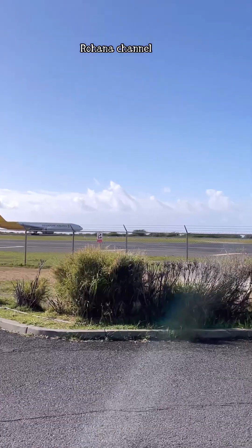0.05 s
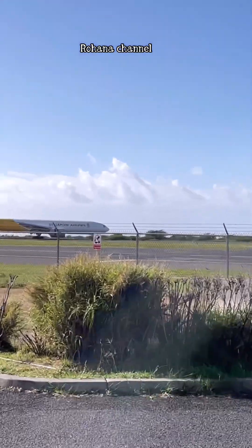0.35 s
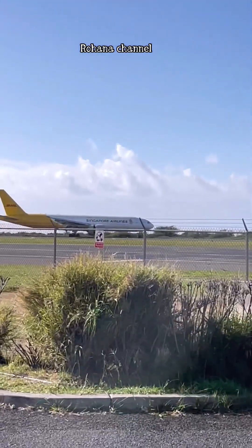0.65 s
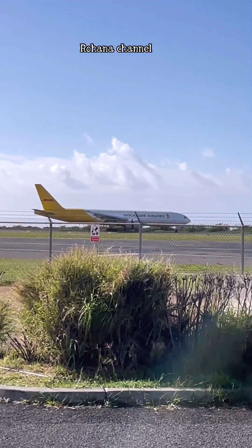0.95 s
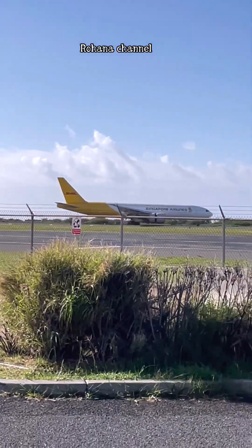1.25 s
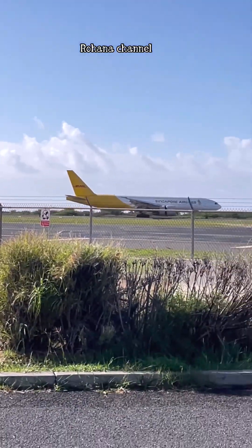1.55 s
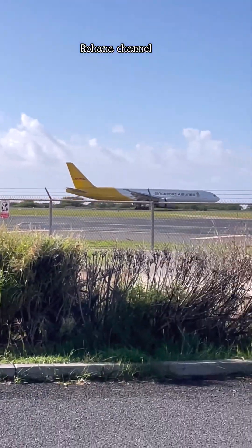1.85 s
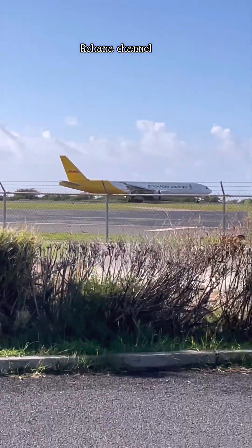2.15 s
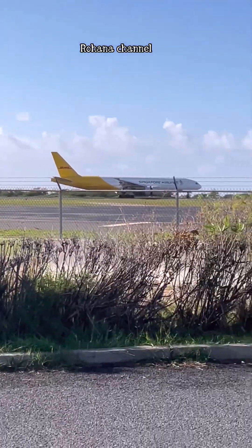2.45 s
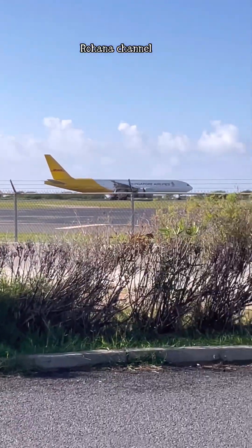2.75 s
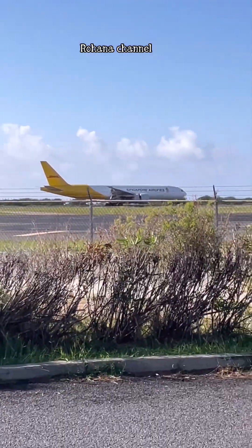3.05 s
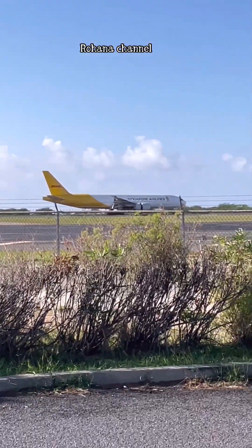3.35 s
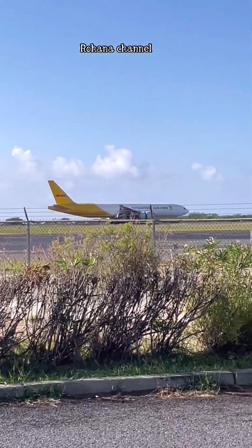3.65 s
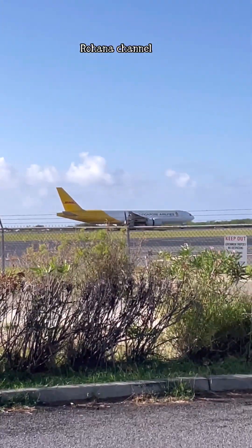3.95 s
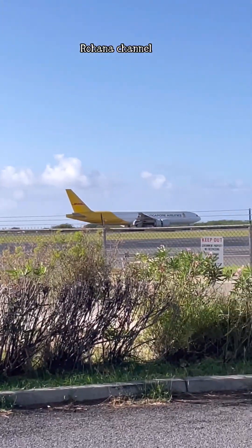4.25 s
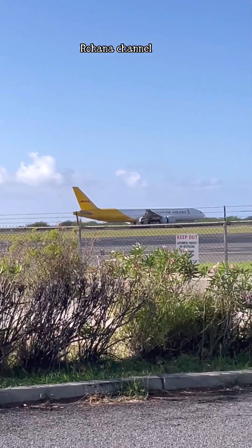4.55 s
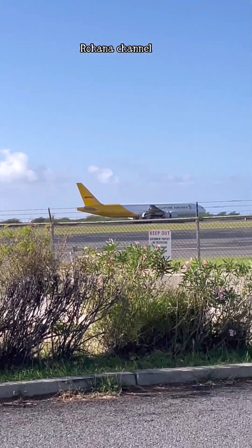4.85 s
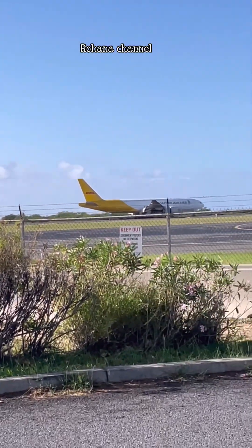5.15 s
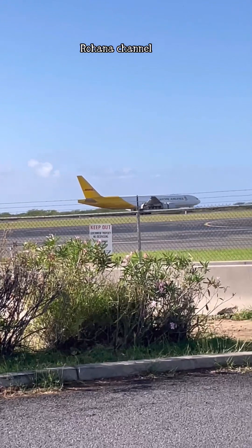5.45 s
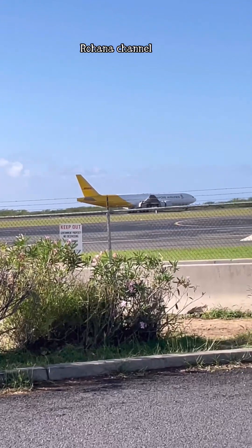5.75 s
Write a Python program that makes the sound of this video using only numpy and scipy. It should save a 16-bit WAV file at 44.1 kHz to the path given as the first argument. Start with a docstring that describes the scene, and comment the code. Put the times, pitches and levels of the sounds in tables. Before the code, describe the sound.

A large jet rumbles past on a runway, its engine whine slowly falling in pitch over rushing air and a steady low hum.

```python
"""A large jet rumbles and whines past beyond an airport fence, heard through a hand-held phone.
Its exhaust rumbles as it mixes with still air, the air rushing through the engines swells and fades,
and the blade tone of the fans slowly falls to idle; a faint compressor whistle shows through briefly.
A machine hums steadily, a thin high sizzle comes in puffs like a breeze, with a few light ticks,
and something hoots once far off. The midrange starts near the centre, then leans left and widens."""
import sys
import numpy as np
from scipy import signal
from scipy.fft import rfft, irfft, next_fast_len
from scipy.io import wavfile
from scipy.ndimage import uniform_filter1d, map_coordinates

SR = 44100
rng = np.random.default_rng(int(sys.argv[2]) if len(sys.argv) > 2 else 0)


def transcribe(signal):
    """Save signal, clipped to [-1, 1], as a 16-bit WAV file at the path in sys.argv[1]."""
    frames = np.atleast_2d(signal).T
    limited = np.clip(frames, -1, 1)
    pcm = np.round(limited * 32767).astype(np.int16)
    wavfile.write(sys.argv[1], SR, pcm)


N = 256529

# How the air on the way swells the engines' treble. Each row: time in seconds, relative level in dB.
TREBLE_SWELLS = [(.14, -45), (.33, -40), (.48, -41.5), (.66, -47), (1.08, -48), (1.58, -44), (1.75, -41),
                 (1.89, -37.5), (2.03, -38.5), (2.2, -44), (2.53, -44.5), (2.58, -42), (3.1, -42),
                 (3.7, -42.5), (3.85, -41), (4.22, -40.5), (4.65, -44.5), (5.18, -47), (5.75, -42)]


def amp(db):
    """Decibels to gain."""
    return 10 ** (np.asarray(db) / 20)


def unit(x):
    """Scale to rms 1."""
    return x / np.sqrt(np.mean(np.abs(x) ** 2) + 1e-20)


def clock():
    """The time of every sample, in seconds."""
    return np.arange(N) / SR


def along(points, hz):
    """Read a curve of (Hz, value) points on a log frequency axis."""
    knots_hz, values = np.transpose(points)
    return np.interp(np.log(hz + 1), np.log(knots_hz + 1), values)


def curves(rows):
    """One value per sample for each column after the time."""
    times, *columns = np.transpose(rows)
    return [np.interp(clock(), times, column) for column in columns]


def swell(levels):
    """How far the air lifts a part of the sound above its average level, in dB."""
    level_db, = curves(levels)
    return level_db - level_db.mean()


def wobble(rate):
    """A smooth random curve, rate knots a second."""
    return map_coordinates(rng.standard_normal(int(N * rate / SR) + 4), [clock() * rate])


def filtered(x, response):
    """Filter x by a complex response, given as a function of Hz."""
    size = next_fast_len(N + SR // 2)
    return irfft(rfft(x, size) * response(np.fft.rfftfreq(size, 1 / SR)), size)[..., :N]


def steadied(x, hold_s):
    """Even out the slow chance swells of a sound and keep its fast flutter."""
    power = uniform_filter1d(np.mean(x ** 2, axis=0), size=int(hold_s * SR))
    return x / np.sqrt(np.abs(power) + 1e-9)


def turbulence(spectrum, patchy_db):
    """Two unrelated noises of rms 1, coloured by the spectrum, with drifting patches of gain."""
    bins = signal.stft(rng.standard_normal((2, N)), nperseg=1024)[2]
    patches = uniform_filter1d(rng.standard_normal(bins.shape[1:]), size=7, axis=0)
    patches = uniform_filter1d(patches, size=12, axis=1)
    pair = signal.istft(bins * amp(patchy_db * unit(patches)), nperseg=1024)[1][:, :N]
    return unit(filtered(pair, lambda hz: amp(along(spectrum, hz))))


def fuzzy_tone(pitch_hz, width_hz):
    """Two unrelated signals of one tone whose strength and phase are scrambled by turbulent air."""
    a, b = filtered(rng.standard_normal((2, 2, N)), lambda hz: 1 / (1 + (2 * hz / width_hz) ** 2))
    phase = 2 * np.pi * np.cumsum(pitch_hz) / SR
    return unit(a * np.cos(phase) + b * np.sin(phase))


def exhaust(abreast_s=1.26, rise_db_per_s=0.5, fade_db_per_s=1.74, sink_db_per_s=0.32):
    """Hot jets mix with still air: a deep rumble slowly sinks; its body peaks with the jet abreast."""
    # Colour of the deep rumble and its upper body. Each row: frequency in Hz, relative level in dB.
    deep_spectrum = [(15, -50.5), (25, -20.5), (31, -14.5), (45, -1), (60, 8.5), (80, 9), (105, -2.5),
                     (150, -12.5), (300, -84)]
    body_spectrum = [(20, -64.5), (60, -14), (105, -0.5), (145, 0.5), (200, -5), (250, -10), (320, -24.5),
                     (450, -34.5), (600, -44.5), (1000, -87)]
    t = clock()
    deep_db = -24.5 - sink_db_per_s * t
    body_db = -23.5 - rise_db_per_s * np.maximum(abreast_s - t, 0)
    body_db -= fade_db_per_s * np.maximum(t - abreast_s, 0)
    deep = steadied(turbulence(deep_spectrum, patchy_db=1.5), hold_s=.45)
    body = steadied(turbulence(body_spectrum, patchy_db=0.5), hold_s=.45)
    return amp(deep_db) * deep + amp(body_db) * body


def rush(hiss_fade_db_per_s=1.09):
    """Air rushes through the engines in three bands; eddies flutter the roar and hiss together."""
    # Colour of the low roar, the roar and the hiss. Each row: frequency in Hz, relative level in dB.
    low_spectrum = [(180, -20), (300, 3), (420, 1.5), (560, -3), (750, -11.5), (1400, -62.5)]
    roar_spectrum = [(200, -19.5), (420, -11), (600, -2), (800, 2.4), (1150, 2), (1700, 0.5), (1950, -1),
                     (2200, -5.5), (2500, -7.5), (3500, -8), (6000, -57)]
    hiss_spectrum = [(1200, -7.5), (2150, 10.5), (2480, 4.5), (3200, 3), (3600, 4), (4000, 5), (4900, 2),
                     (5400, 1), (6100, -4), (7000, -10), (8400, -13), (10000, -45.5), (12000, -80.5)]
    # How the air on the way swells each roar. Each row: time in seconds, relative level in dB.
    low_swells = [(.15, -43), (.85, -41), (1.3, -47), (1.4, -37.5), (1.65, -39), (1.98, -39.5), (2.25, -45),
                  (3.2, -41.5), (3.45, -44), (4.05, -47.5), (4.45, -50.5), (5.2, -49), (5.5, -45),
                  (5.8, -41.5)]
    roar_swells = [(.15, -41), (.38, -40.5), (.68, -44), (.92, -41), (1.25, -43), (1.6, -37.5), (2.03, -36),
                   (2.22, -40), (2.5, -38), (2.98, -36), (3.55, -41), (3.95, -37.8), (4.2, -37),
                   (4.7, -42.5), (5.28, -43.5), (5.76, -37.5)]
    flutter = wobble(15)
    low = amp(-46 + swell(low_swells)) * turbulence(low_spectrum, patchy_db=0)
    roar = amp(-39 + swell(roar_swells) + 0.27 * flutter) * turbulence(roar_spectrum, patchy_db=1.36)
    hiss_db = -43 + 0.82 * swell(TREBLE_SWELLS) - hiss_fade_db_per_s * clock() + 0.87 * flutter
    return low + roar + amp(hiss_db) * turbulence(hiss_spectrum, patchy_db=1.6)


def fans(start_hz=1601, sag_hz_per_s=74, idle_hz=1228, apart_hz=24):
    """Two fans spool down to idle: narrow blade tones on a rasping skirt, with their octave above."""
    # How the air on the way swells the whine. Each row: time in seconds, relative level in dB.
    whine_swells = [(.15, -36.5), (.42, -39.5), (.57, -33), (.74, -38.5), (.86, -33), (1.01, -39),
                    (1.15, -34.5), (1.55, -35), (1.93, -24.5), (2.17, -28.5), (2.33, -31.5), (2.6, -27.5),
                    (2.66, -30.5), (2.73, -27), (2.82, -29.5), (3.03, -29.5), (3.16, -27), (3.35, -32),
                    (3.55, -30), (3.73, -36.5), (3.96, -28.5), (4.12, -28.5), (4.5, -32), (4.8, -37.5),
                    (5.4, -37.5), (5.72, -34)]
    t = clock()
    pitch_hz = np.maximum(start_hz - sag_hz_per_s * t, idle_hz) + 4 * wobble(12)
    whine_db, treble_db = swell(whine_swells), swell(TREBLE_SWELLS)
    rasp = pitch_hz / np.mean(pitch_hz)  # faster blades scatter more of the tone into its skirt
    lower_fan = fuzzy_tone(pitch_hz - apart_hz / 2, width_hz=48)
    upper_fan = fuzzy_tone(pitch_hz + apart_hz / 2, width_hz=48)
    core = amp(-4) / rasp * unit(lower_fan + upper_fan)
    # Each swell blurs the tones: the broad skirt and halo grow faster than the narrow parts.
    skirt = amp(-0.5 + 0.2 * whine_db) * rasp ** 5 * fuzzy_tone(pitch_hz, width_hz=210)
    octave = amp(-52 + 0.33 * treble_db + 0.06 * t) * fuzzy_tone(2 * pitch_hz, width_hz=290)
    halo = amp(-53 + 2.2 * treble_db) * rasp ** 2 * fuzzy_tone(2 * pitch_hz, width_hz=680)
    whine = amp(-36.5 + whine_db + .5 * wobble(22)) * steadied(core + skirt, hold_s=.14)
    return whine + octave + halo


def machine(pitch_hz=127.3, level_db=-30.5, waver_db=1.8, swell_at_s=3.83, fade_db_per_s=.5):
    """An engine hum: its fundamental churns, swells once and recedes; each overtone wavers alone."""
    # The hum's harmonics. Each row: multiple of the pitch, relative level in dB.
    harmonics = [(1, 1), (3, -27.5), (4, -27), (5, -27), (6, -26.5), (7, -29.5), (8, -30)]
    (_, fundamental_db), *overtones = harmonics
    t = clock()
    swell_db = 3.5 * np.exp(-((t - swell_at_s) / 0.9) ** 2)
    phase = 2 * np.pi * np.cumsum(pitch_hz + 0.346 * wobble(3)) / SR
    drone_db = fundamental_db + swell_db - fade_db_per_s * t + waver_db * wobble(11)
    hum = amp(drone_db) * np.sin(phase + 0.31 * wobble(14))
    for multiple, db in overtones:
        gain = amp(db + waver_db * wobble(3))
        blurred_phase = multiple * (phase + 0.037 * wobble(18))  # higher ones blur more
        hum += gain * np.sin(blurred_phase + rng.uniform(0, 2 * np.pi))
    return amp(level_db) * np.sqrt(2) * hum


def breeze(crest_start_s=3, crest_end_s=3.37, rise_db_per_s=6, fall_db_per_s=7.5):
    """A faint airy hiss rises, holds and dies away; a thin sizzle flickers with it and flares in puffs."""
    # Colour of the airy hiss and the sizzle. Each row: frequency in Hz, relative level in dB.
    air_spectrum = [(4000, -20), (7400, 1), (8400, 0), (9500, -5), (12000, -10), (13000, -22), (15500, -30)]
    sizzle_spectrum = [(7500, -40), (8400, -20), (9300, -27), (10600, -18), (11150, -3), (11400, -6),
                       (11650, 0), (12100, -6), (12600, -15), (13300, -15), (14000, -6.5), (14450, -9),
                       (14900, -19), (16000, -25)]
    # The strongest puffs of sizzle. Each row: centre in seconds, level in dB, length in seconds.
    puffs = [(1.42, -62, .06), (1.935, -58.5, .1), (2.071, -61, 0.032), (2.306, -51, 0.049),
             (2.455, -45.5, .1), (2.801, -48.5, 0.075), (2.944, -48.5, .09), (3.093, -55.5, 0.062),
             (3.258, -65, 0.048), (3.517, -53, .035), (4.04, -61.5, .035)]
    t = clock()
    wind_db = -rise_db_per_s * np.maximum(crest_start_s - t, 0)
    wind_db -= fall_db_per_s * np.maximum(t - crest_end_s, 0)
    flares = sum(amp(db) * np.exp(-np.abs(2 * (t - at) / length) ** 4 / 2) for at, db, length in puffs)
    flicker = amp(-63 + wind_db + 4.5 * wobble(22))
    air = amp(-60 + wind_db + 1.5 * wobble(30)) * turbulence(air_spectrum, patchy_db=1)[0]
    sizzle = np.hypot(flares, flicker) * turbulence(sizzle_spectrum, patchy_db=2)[0]
    return air + sizzle


def whistle(level_db=-54.5, peak_s=1.95, spread_s=.5, pitch_hz=5350, sag_hz_per_s=130):
    """A faint, breathy compressor whistle sinks and comes through only as the jet goes by."""
    t = clock() - peak_s
    envelope = amp(level_db) * np.exp(-(t / spread_s) ** 2)
    return envelope * fuzzy_tone(pitch_hz - sag_hz_per_s * t, width_hz=380)


def ticks(length_s=.018):
    """A few light ticks, each a tiny burst of high noise."""
    # When the ticks fall. Each row: centre in seconds, level in dB.
    hits = [(2.39, -53), (2.555, -54), (3.08, -53), (3.42, -49)]
    # Their bright colour. Each row: frequency in Hz, relative level in dB.
    spectrum = [(6000, -30), (8500, 0), (10000, -6), (11800, 2), (13000, -14), (15500, -25)]
    bursts = sum(amp(db) * np.exp(-(2 * (clock() - at) / length_s) ** 2) for at, db in hits)
    return bursts * turbulence(spectrum, patchy_db=0.5)[0]


def hoot(at_s=5.425, length_s=0.081, pitch_hz=608, level_db=-38):
    """One short, faint, pure hoot far off."""
    envelope = np.exp(-(2 * (clock() - at_s) / length_s) ** 4)
    return amp(level_db) * envelope * np.sin(2 * np.pi * pitch_hz * clock())


def reflections(x):
    """Two nearby surfaces comb the treble; the comb slides down as the echo paths lengthen."""
    # Small surfaces mirror only short waves. Each row: frequency in Hz, gain in dB.
    mirror_spectrum = [(700, -24), (1400, -6), (1700, 0), (3400, 0), (5000, -9), (8000, -20)]
    # How late the echoes come. Each row: time in seconds, nearer and farther delay in milliseconds.
    delays = [(.6, 1.33, 1.76), (1.2, 1.38, 1.82), (2.6, 1.39, 1.77), (3.3, 1.46, 1.86), (4.2, 1.52, 1.91),
              (5.2, 1.59, 1.94), (5.8, 1.59, 1.91)]
    # How strongly the surfaces answer. Each row: time in seconds, nearer gain, farther gain.
    gains = [(1.3, .19, .12), (2.6, .13, .08), (3.6, .07, .24), (5.0, .03, .19)]
    t = clock()
    treble = filtered(x, lambda hz: amp(along(mirror_spectrum, hz)))
    for delay_ms, gain in zip(curves(delays), curves(gains)):
        x = x + gain * np.array([np.interp(t - delay_ms / 1000, t, part) for part in treble])
    return x


def left_first(x, lead):
    """Sound from the side reaches one microphone first; a positive phase lead favours the left."""
    return filtered(x, lambda hz: np.exp(.5j * np.array([[1], [-1]]) * along(lead, hz)))


def microphones(pair, hum, likeness, lead, lean):
    """Blend two unrelated signals and the hum into left and right; long waves reach both alike."""
    spread = lambda hz: np.arccos(np.clip(along(likeness, hz), 0, 1)) / 2
    mid, side = filtered(pair, lambda hz: np.array([np.cos(spread(hz)), np.sin(spread(hz))]))
    stereo = np.array([mid + side, mid - side]) + hum
    balance = lambda hz: 2 / (1 + amp(np.array([[-1], [1]]) * along(lean, hz)))
    return left_first(filtered(stereo, balance), lead)


def scene(shift_start_s=1.16, shift_end_s=2.16):
    """The jet and the airfield; the midrange starts near the centre, then leans left and widens."""
    # How alike left and right are; the bass and a band near 4 kHz sound almost mono.
    # Each row: frequency in Hz, coherence from 0 to 1.
    likeness_centred = [(70, .9997), (130, .997), (250, .99), (450, .94), (620, .86), (1000, .98),
                        (2100, .985), (2800, .92), (4300, .995), (6200, .8), (8000, .75)]
    likeness_leftward = [(70, .9999), (130, .9992), (250, .995), (450, .94), (620, .78), (850, .92),
                         (1350, .95), (1900, .92), (2800, .91), (4300, .995), (6200, .8), (8000, .75)]
    # How far the left channel leads. Each row: frequency in Hz, phase in radians.
    lead_centred = [(200, 0), (450, -.22), (800, 0), (2250, 0), (2750, .65), (3600, .05), (4900, .1),
                    (6300, 1.5), (9300, 3.05)]
    lead_leftward = [(250, 0), (450, .1), (600, .45), (800, .15), (1050, .55), (1450, .15), (1820, .75),
                     (2200, .05), (2750, .7), (3600, .05), (4900, .1), (6300, 1.5), (9300, 3.05),
                     (12400, 3.2), (14500, 3.6)]
    # How far the sound leans left. Each row: frequency in Hz, left over right in dB.
    lean_centred = [(150, 0), (400, .7), (800, 2), (1100, 0), (1550, -2.7), (2300, 0)]
    lean_leftward = [(60, 0), (120, .3), (220, .9), (430, 3), (630, 7), (900, 5.3), (1130, 9), (1340, 10.7),
                     (1550, 5.2), (1850, 1), (2100, -1.5), (3500, 0)]
    jet = reflections(exhaust() + rush() + fans() + whistle())
    hum = machine()
    centred = microphones(jet, hum, likeness_centred, lead_centred, lean_centred)
    leftward = microphones(jet, hum, likeness_leftward, lead_leftward, lean_leftward)
    shift = np.interp(clock(), [shift_start_s, shift_end_s], [0, 1])
    sparkle = left_first(breeze() + ticks(), lead_leftward)
    return (1 - shift) * centred + shift * leftward + sparkle + hoot()


def record(dry, top_hz=15700):
    """The sound fades in quickly, and its treble stops at the phone's band limit."""
    fade_in = np.clip((clock() - .01) / .12, 0, 1)
    return filtered(dry * fade_in, lambda hz: hz < top_hz)


dry = scene()
out = record(dry)
transcribe(out)
```